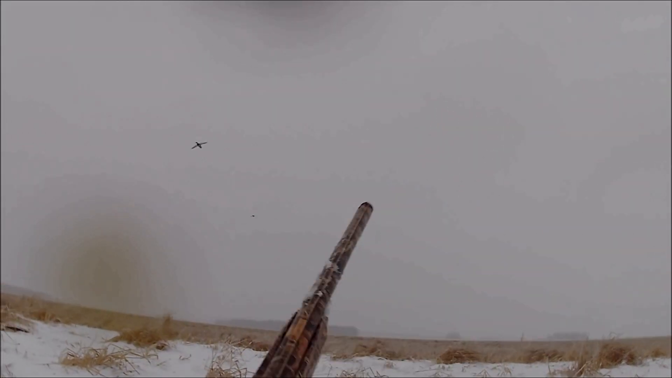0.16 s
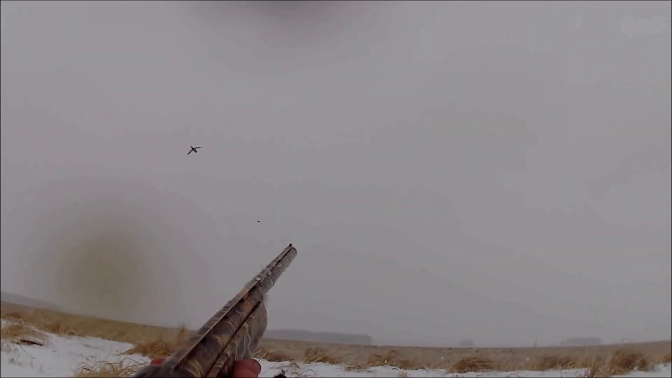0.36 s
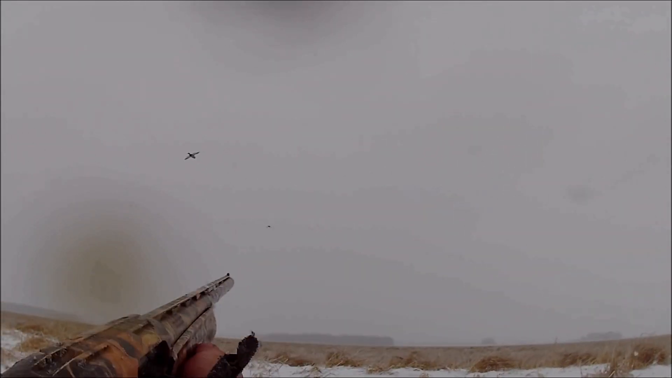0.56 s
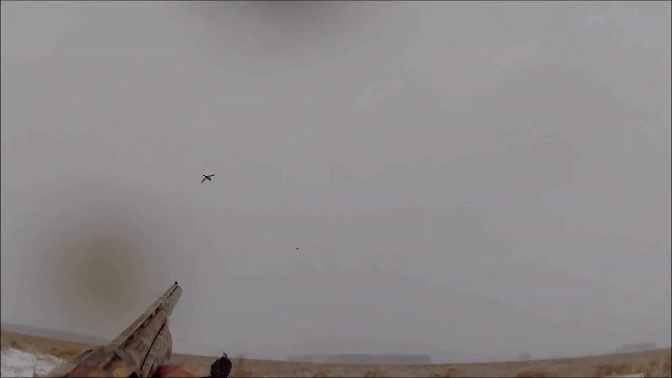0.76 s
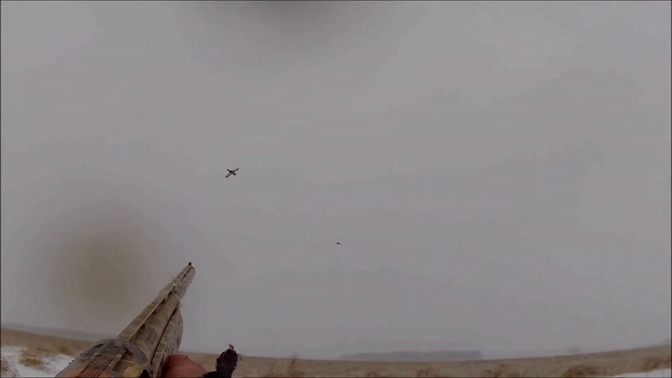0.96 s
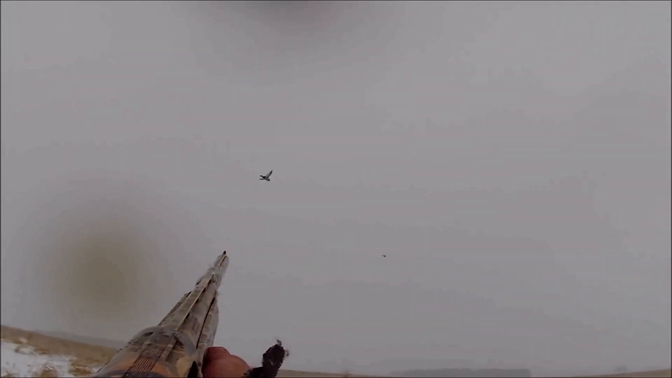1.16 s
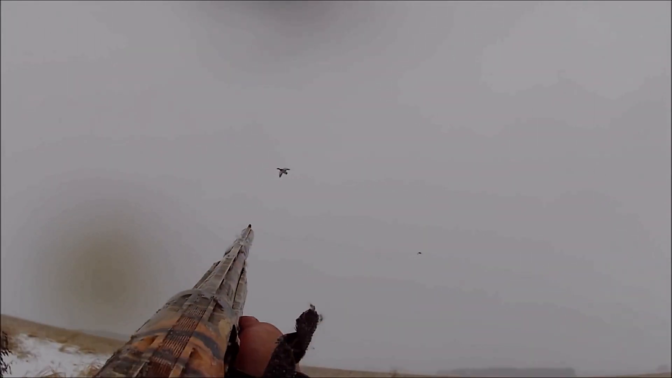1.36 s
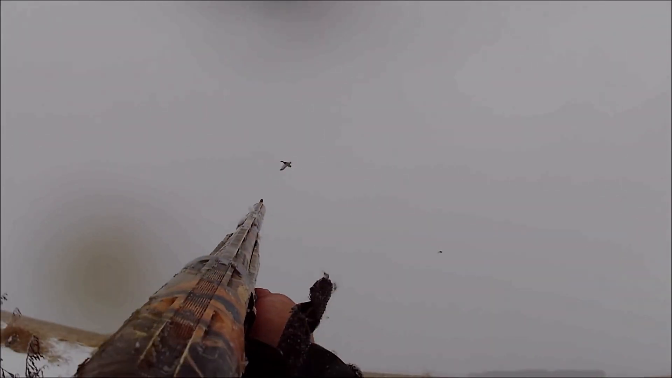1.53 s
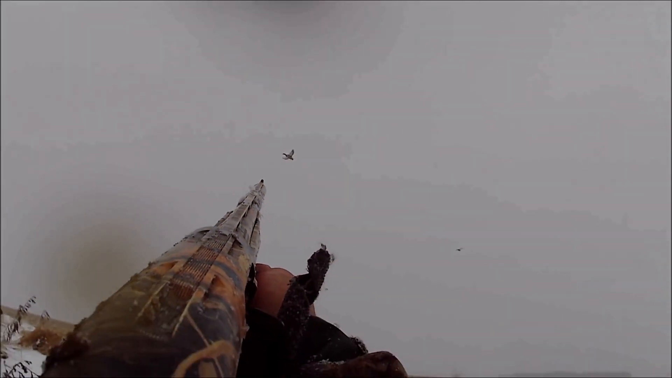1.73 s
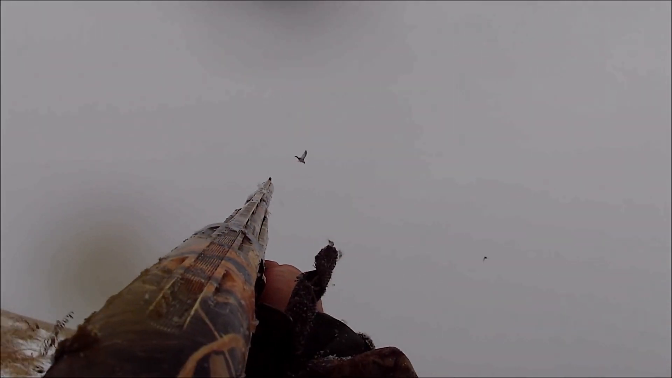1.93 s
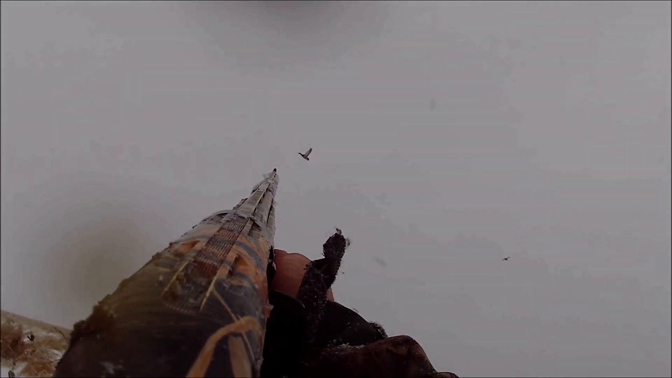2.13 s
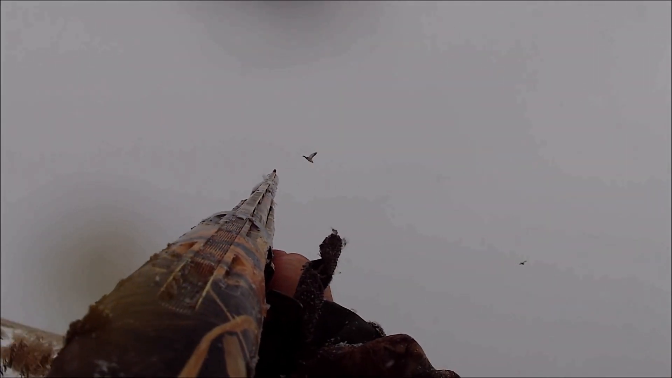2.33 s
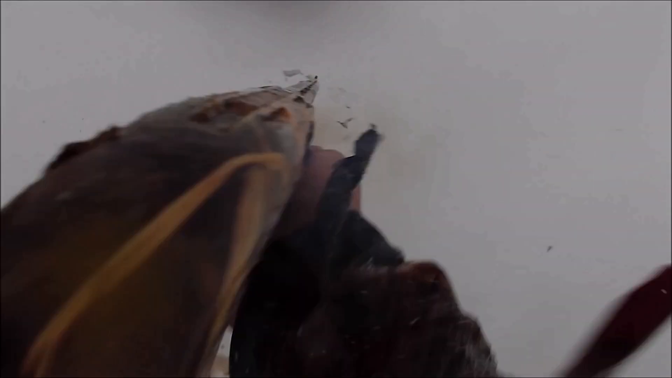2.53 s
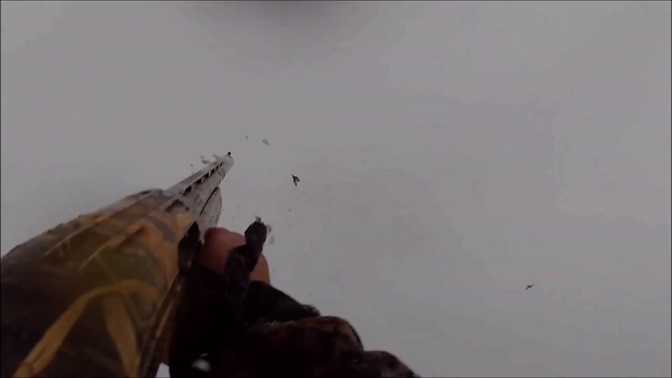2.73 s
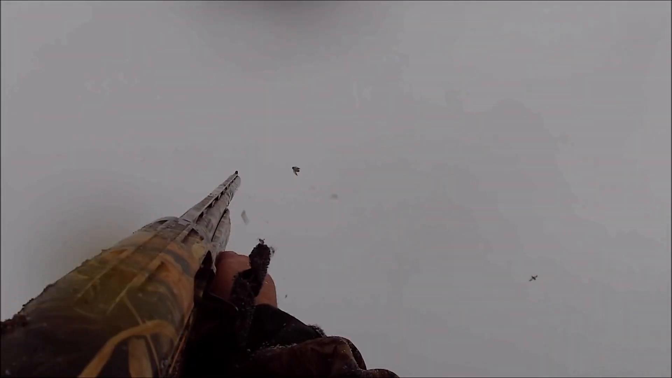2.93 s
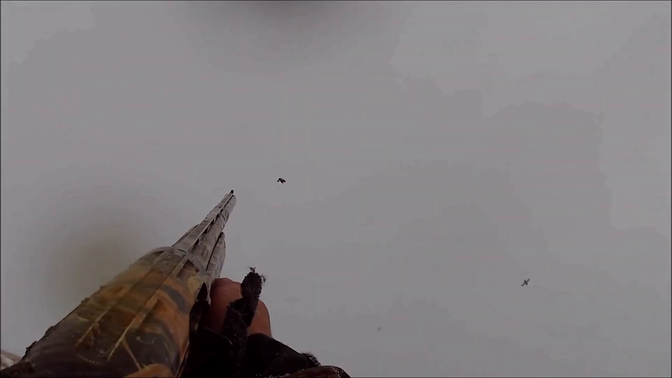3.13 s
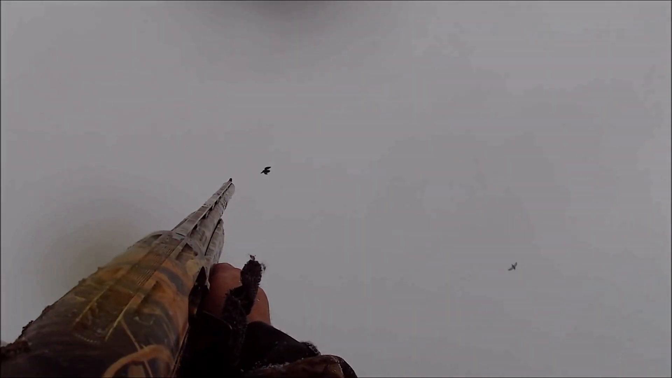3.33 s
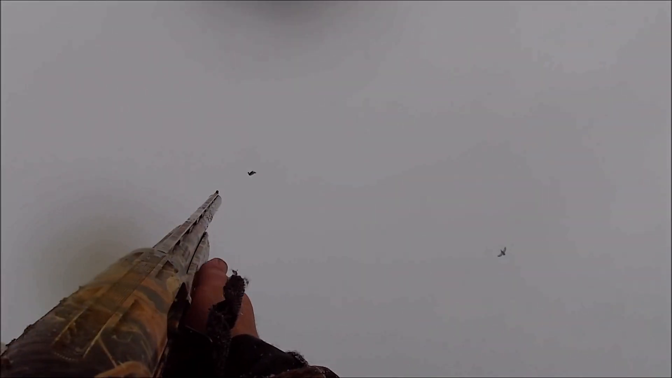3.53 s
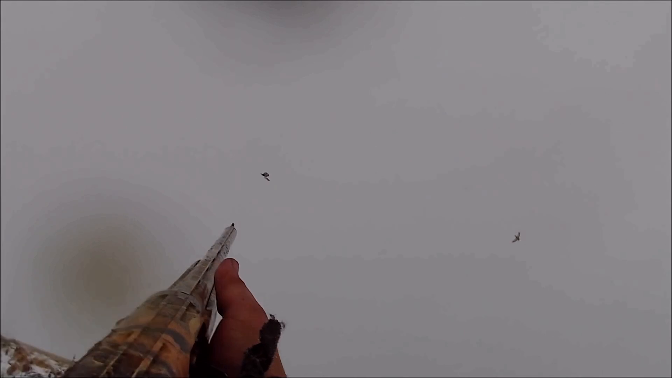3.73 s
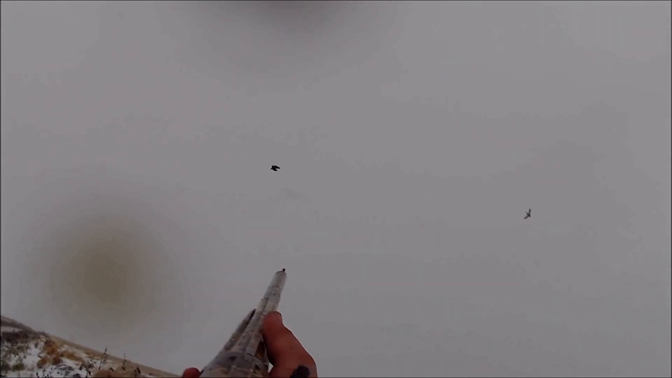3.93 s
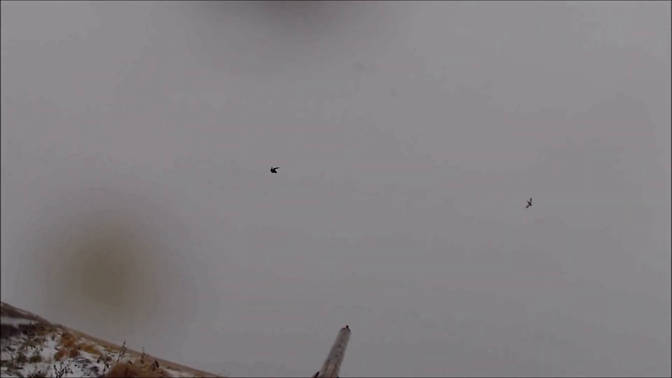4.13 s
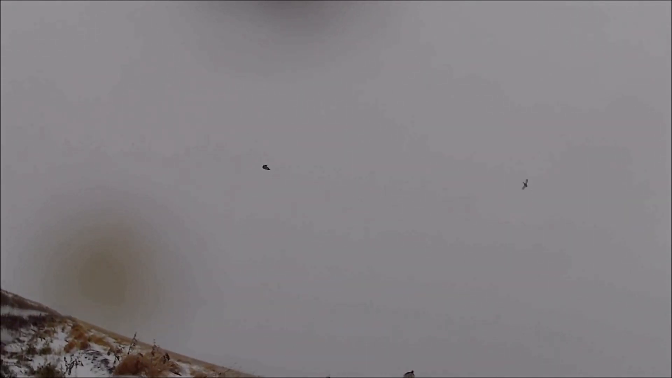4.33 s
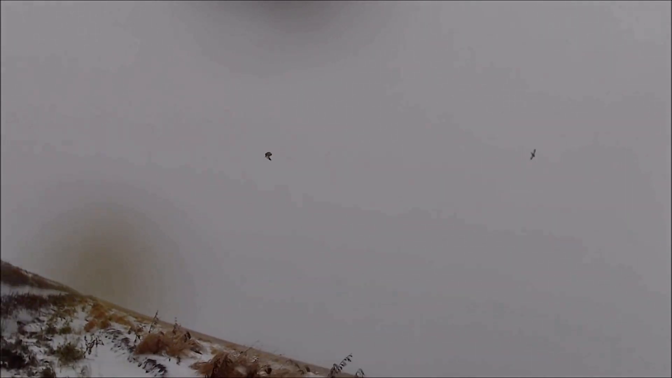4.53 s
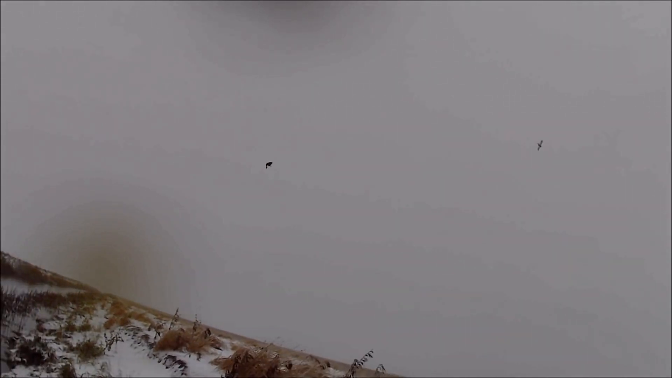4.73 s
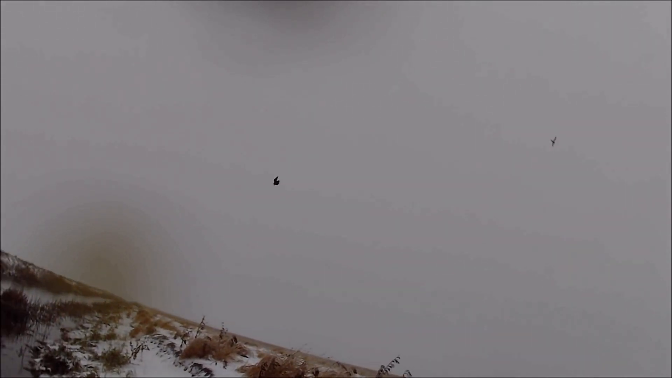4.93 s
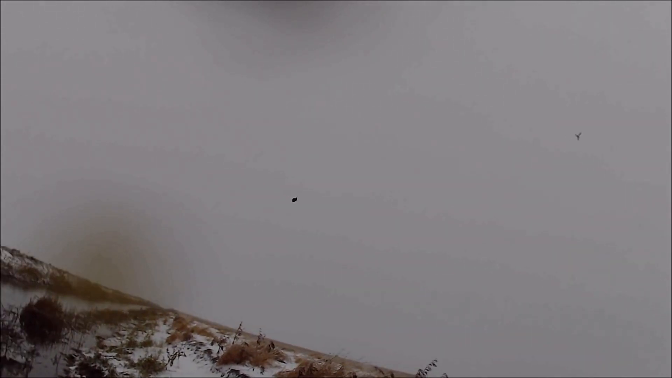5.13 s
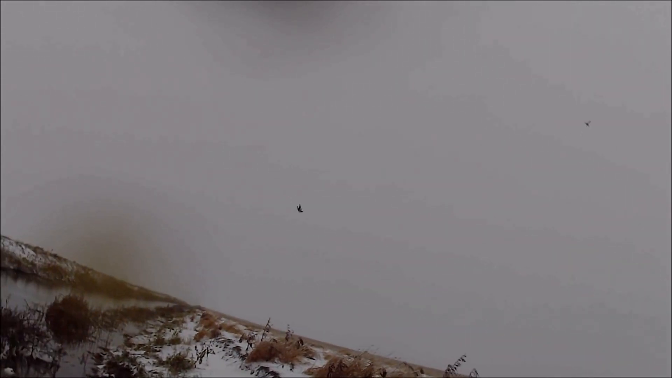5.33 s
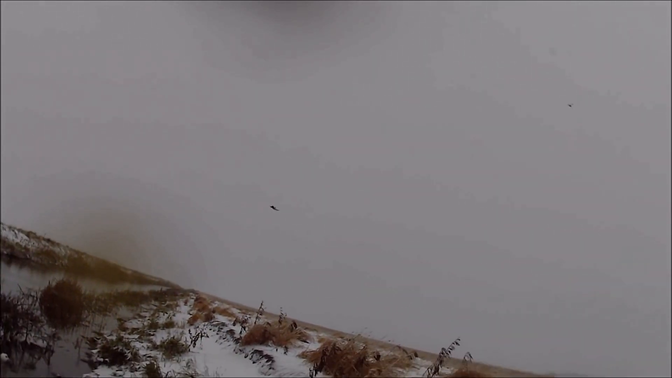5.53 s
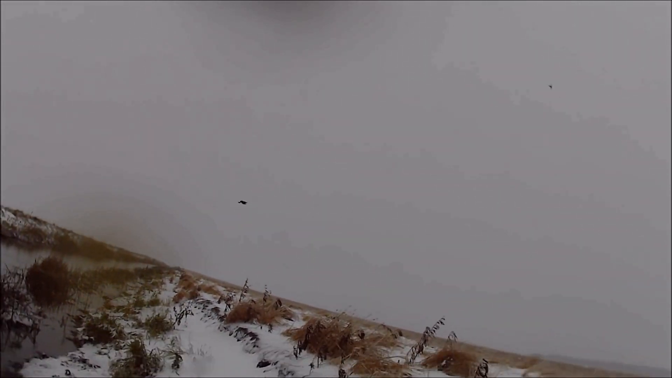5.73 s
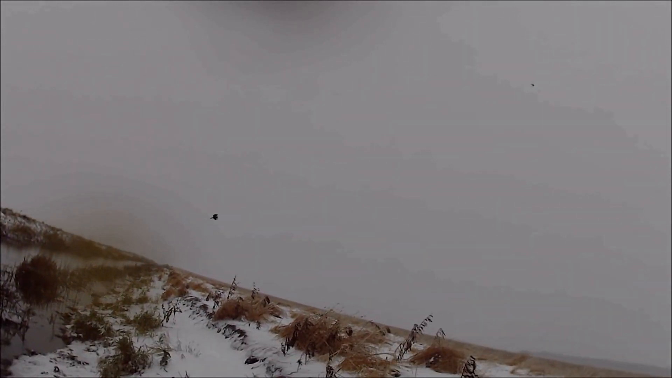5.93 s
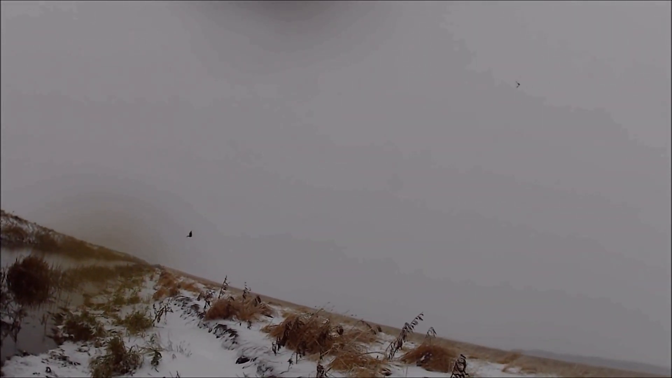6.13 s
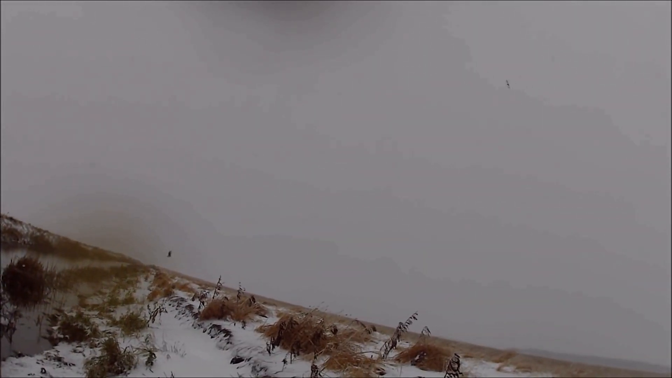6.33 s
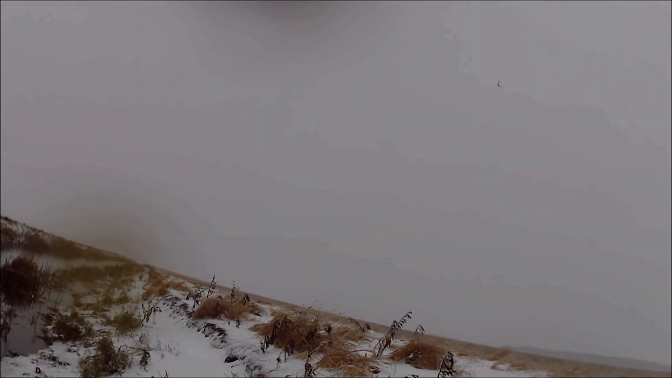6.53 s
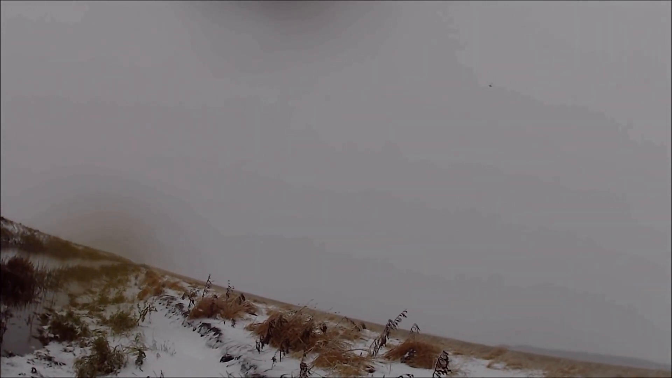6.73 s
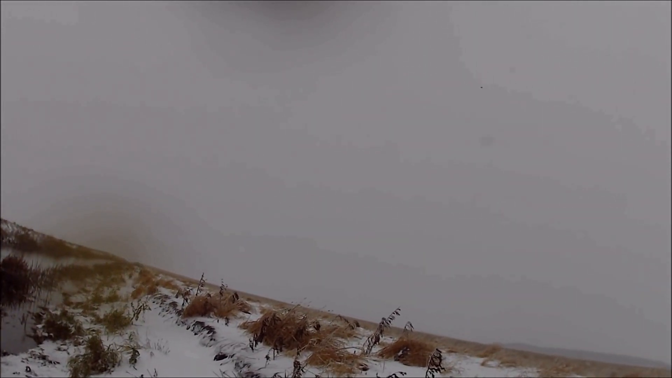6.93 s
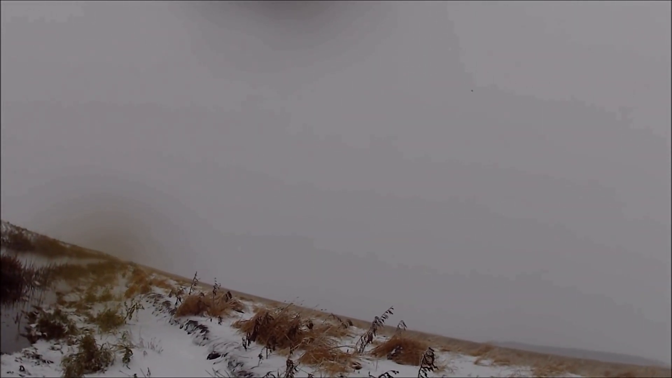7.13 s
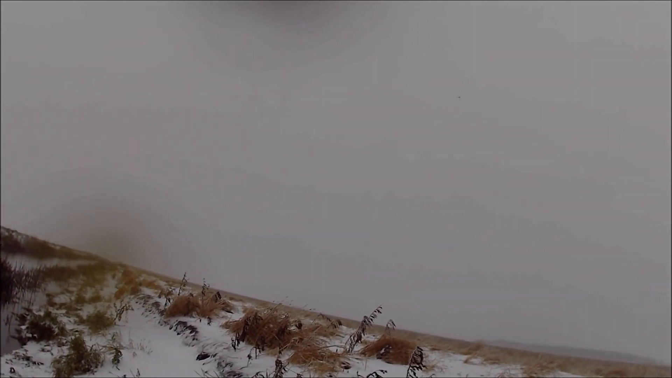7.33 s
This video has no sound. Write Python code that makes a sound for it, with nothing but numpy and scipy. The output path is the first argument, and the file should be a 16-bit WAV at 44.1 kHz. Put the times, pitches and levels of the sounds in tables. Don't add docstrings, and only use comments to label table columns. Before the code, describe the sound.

A small microphone in a closed case, worn on the head outdoors, gives a dull, narrow sound with faint steady hiss and low wind rumble. From 0 to 0.9 s a jacket and sleeve rustle close by, with a sharp gun tick at 0.6 s. Soft wind thumps and a cluster of light clicks come from 1.1 to 1.6 s, then it grows nearly still. At 2.55 s a single shotgun blast hits, extremely loud and flattened by overload, about 25 milliseconds long, dropping abruptly. Short crackling echoes fade by 2.9 s, with hard steel clacks at 2.6 and 2.8 s. Another clack comes at 3.36 s. From 3.3 to 5.3 s cloth rustles in uneven swells, with small ticks and muffled buffets, strong at 4.7 and 5.3 s. More thumps cluster around 5.8 s with faint clicks; rustle thins, and heavier wind buffets return from 7.1 s to the end near 7.4 s.

```python
import sys
import numpy as np
from scipy import signal
from scipy.fft import rfft, irfft, next_fast_len
from scipy.io import wavfile

SR = 44100
rng = np.random.default_rng(int(sys.argv[2]) if len(sys.argv) > 2 else 0)


def dump(signal):
    limited = np.clip(np.atleast_2d(signal).T, -1, 1)
    pcm = np.round(limited * 32767).astype(np.int16)
    wavfile.write(sys.argv[1], SR, pcm)


def boost_factor(decibels):
    exponent = np.asarray(decibels, float) / 20
    return 10 ** exponent


N = 329427

# pitch_hz, level_db (per Hz)
HISS_SPECTRUM = [(180, -23.5), (300, -4), (891, -7), (1510, -9.5), (2300, -20), (3290, -15), (6000, -19),
                 (6400, -20), (8320, -47), (14100, -120)]
# time_s, level_db
WIND_GUSTS = [(0.0, -52), (0.83, -56), (1.04, -50), (1.74, -57.5), (2.29, -56.5), (2.58, -51), (2.8, -53),
              (2.99, -52), (3.3, -45.5), (3.49, -54.5), (4.17, -51.5), (4.49, -54.5), (5.09, -55.5),
              (5.46, -49.5), (5.77, -44.5), (6.56, -55.5), (7.1, -44), (7.46, -49.5)]
# pitch_hz, level_db (per Hz)
WIND_SPECTRUM = [(8, -11), (20, 4.5), (60, -3), (120, -11.5), (250, -20), (450, -35), (900, -56)]
# centre_s, peak_db, pitch_hz
THUMPS = [(1.132, -31.5, 129), (1.183, -39.5, 180), (2.977, -39.5, 168), (3.045, -37.5, 170),
          (3.104, -34, 160), (3.217, -27.5, 150), (3.39, -28.5, 130), (3.646, -35.5, 130),
          (3.704, -33, 204), (3.948, -34, 148.6), (4.088, -36.5, 130), (4.709, -23, 241),
          (4.757, -31.5, 129.5), (5.213, -27.5, 150), (5.271, -30.5, 160), (5.32, -20.5, 149),
          (5.357, -27.5, 129), (5.382, -28, 184), (5.721, -28.5, 208), (5.765, -23, 180), (5.839, -23, 168),
          (5.859, -23.5, 224), (6.102, -33.5, 108), (6.353, -31.5, 209.3), (6.766, -31, 128),
          (7.072, -26.5, 220), (7.172, -29, 225), (7.203, -20.5, 199), (7.258, -30, 189.5),
          (7.314, -22, 410)]
# start_s, spacing_s, peak_db, pitch_hz, count
FLURRIES = [(0.916, 0.013, -38.5, 298, 4), (3.312, 0.018, -35, 170, 9), (3.86, 0.032, -42.5, 100, 3),
            (4.298, 0.02, -35, 147, 4), (5.54, 0.043, -32.5, 94, 5), (5.736, 0.025, -32, 150, 4),
            (5.848, .014, -33.5, 130, 5), (5.909, 0.019, -46, 151, 3), (6.311, 0.025, -36, 100, 3),
            (6.72, 0.023, -37.5, 90, 3), (6.9, 0.039, -42, 70, 5), (7.241, 0.015, -33, 211, 8),
            (7.411, 0.025, -38.5, 160, 3)]
# peak_s, swell_s, fade_s, level_db, brightness_db
CLOTH_MOVES = [(.4, 0.3, 0.13, -41, 5), (0.512, 0.07, 0.081, -35, 1.5), (.66, 0.11, 0.12, -43, 2.5),
               (0.888, 0.1, 0.069, -39, 4), (1.23, 0.3, 0.2, -52.5, 4.5), (1.552, 0.079, 0.29, -62, 8),
               (1.84, 0.088, .08, -64.5, 14), (2.502, 0.044, 0.055, -60.5, 11), (2.92, 0.072, 0.31, -48, 5),
               (3.33, 0.26, 0.24, -45, 0), (3.54, 0.053, 0.11, -47, -3.5), (3.73, 0.12, 0.12, -52, 2.5),
               (3.96, 0.14, 0.14, -45, 6), (4.119, 0.19, 0.055, -41, 7), (4.26, 0.15, 0.052, -48, 2.5),
               (4.4, 0.15, 0.22, -45, 7), (4.57, 0.17, 0.078, -41.5, 2.5), (4.83, 0.17, 0.17, -46, 4.5),
               (5.03, 0.2, 0.41, -44, 6.5), (5.278, 0.36, 0.23, -51.5, 4.5), (5.6, .14, .12, -57.5, 6.5),
               (5.98, 0.085, .18, -55, 1.5), (6.4, 0.56, 0.66, -53, -1.5), (6.95, 0.057, 0.091, -49, 2.5)]
# pitch_hz, level_db (per Hz)
CLOTH_SPECTRUM = [(150, -18), (250, -7), (294, -7.5), (440, -4.5), (667, -0.5), (1140, -3.5), (1550, -1.5),
                  (1880, -4), (2120, -2), (2590, -4.5), (3930, -15.5), (6200, -17.5), (8060, -41),
                  (13600, -120)]
# start_s,
# peak_db, pitch_hz
TICKS = [(0.215, -41.5, 2260), (0.4825, -30, 2240), (0.6088, -18, 1450), (1.174, -38, 1740),
         (1.2059, -24.5, 740), (1.214, -24.5, 2280), (1.2433, -26, 760), (1.2647, -38, 1680),
         (1.3053, -38, 1840), (1.4268, -29, 890), (1.457, -29.5, 1020), (1.501, -40.5, 2280),
         (1.538, -29, 1470), (1.5696, -29.5, 1540), (3.523, -34.5, 1946), (3.7, -36, 2980),
         (3.7196, -29, 1760), (5.5747, -31.5, 2780), (5.623, -39.5, 2720), (5.766, -39, 1040),
         (5.8453, -35, 790), (5.8601, -33.5, 793), (5.9757, -41, 1790), (6.255, -38, 1500),
         (6.517, -38, 1570), (7.0704, -41, 780), (7.165, -38, 1290), (7.2004, -43, 825), (7.239, -38, 990),
         (7.3132, -35, 1030)]
# start_s, peak_db, pitch_hz
CLACKS = [(2.605, -7.5, 1960), (2.7765, -15, 2250), (2.7859, -13, 2370), (2.7952, -6.5, 2250),
          (2.7998, -17.5, 2600), (3.357, -16.5, 2944), (3.432, -31.5, 2500), (3.7651, -31.5, 2620),
          (5.9475, -34.5, 2070), (5.9498, -35.5, 1283), (5.9515, -27, 590)]
# time_s, level_db
BLAST_LEVEL = [
    (2.531, -60),
    (2.537, -27),
    (2.5492, -23),
    (2.5498, 11),
    (2.558, 9),
    (2.5715, 2),
    (2.5735, -19),
    (2.582, -28),
]
# pitch_hz, level_db (per Hz)
BLAST_SPECTRUM = [(40, -7.5), (150, -6.5), (400, -5), (1000, -2.5), (2000, -1), (3000, -8), (5000, -9.5),
                  (7000, -20)]
# peak_s, peak_db
ECHOES = [
    (2.603, -20),
    (2.625, -29),
    (2.679, -28),
    (2.738, -30.5),
    (2.77, -30.5),
    (2.798, -26.5),
    (2.86, -38.5),
]


def in_time(rows):
    s, *columns = np.transpose(rows)
    return [np.interp(np.arange(N) / SR, s, c) for c in columns]


def rms_one(x):
    return x / np.sqrt(np.mean(x ** 2) + 1e-20)


def coloured(x, spectrum):
    hz, db = np.transpose(spectrum)
    size = next_fast_len(N)
    grid = np.maximum(np.arange(size // 2 + 1) * SR / size, 1)
    gain = boost_factor(np.interp(np.log(grid), np.log(hz), db))
    return rms_one(irfft(rfft(x, size) * gain, size)[:N])


def drift(rate_hz):
    r = np.exp(-2 * np.pi * rate_hz / SR)
    wander = signal.lfilter([1], [1, -2 * r, r * r], rng.standard_normal(N + SR))
    return rms_one(wander[SR:])


def grains(per_s, spread_db):
    sizes = boost_factor(spread_db * np.minimum(rng.exponential(1, N), 5)) * rng.choice([-1, 1], N)
    return sizes * (rng.random(N) < per_s / SR)


def steep(x, hz, kind):
    grid = np.arange(N // 2 + 1) * SR / N
    below = np.clip((hz - grid) / 60 + .5, 0, 1)
    return irfft(rfft(x) * (below if kind == "low" else 1 - below), N)


def patchy(x, patch_db, rate_hz):
    edges = 200 * 2 ** np.arange(0, 6.1, 1 / 3)
    total = np.zeros(N)
    for pair in zip(edges, edges[1:]):
        band = signal.butter(1, pair, "band", fs=SR, output="sos")
        total += boost_factor(patch_db * drift(rate_hz)) * signal.sosfilt(band, x)
    return rms_one(total)


def hiss():
    return boost_factor(-61.5) * coloured(rng.standard_normal(N), HISS_SPECTRUM)


def wind():
    level_db, = in_time(WIND_GUSTS)
    lumps = boost_factor(3.0 * drift(9))
    return boost_factor(level_db + 5.5) * lumps * coloured(grains(340, 0.59), WIND_SPECTRUM)


def flurries():
    even = np.array([(start + k * gap, db, hz, gap)
                     for start, gap, db, hz, count in FLURRIES for k in range(round(count))])
    s, db, hz, gap = even.T
    late, louder, higher = np.clip(rng.standard_normal((len(even), 3)), -2, 2).T
    return list(zip(s + .2 * gap * late, db - 1.5 * louder, hz * np.exp(.27 * higher)))


def thumps():
    half = 1300
    out, t = np.zeros(N), np.arange(-half, half) / SR
    buffets = list(THUMPS) + flurries()
    for (s, db, hz), phase in zip(buffets, rng.uniform(0, 2 * np.pi, len(buffets))):
        push = np.cos(2 * np.pi * .9 * hz * t + phase) / (1 + (2.6 * hz * t) ** 2) ** 1.3
        flick = np.cos(2 * np.pi * 2.3 * hz * t + 2 * phase) / (1 + (5.0 * hz * (t - .001)) ** 2)
        thump = boost_factor(db + 3.0) * (push + 0.34 * flick)
        at = round(s * SR) - half
        out[at:at + len(t)] += thump[:N - at]
    return out


def rustle():
    still_db, still_bright_db = -69, 7
    t = np.arange(0, N, 64) / SR
    power = []
    for s, swell, fade, db, _ in CLOTH_MOVES:
        away = np.maximum((s - t) / swell, (t - s) / fade)
        power.append(boost_factor(2 * db - 20 * away ** 1.35 if np.all(away >= 0) else 2 * db - 20 * np.abs(away) ** 1.35))
    power = np.array(power)
    still = boost_factor(2 * still_db)
    total = power.sum(axis=0) + still
    bright = (np.array(CLOTH_MOVES)[:, -1] @ power + still_bright_db * still) / total
    level, bright_db = in_time(np.transpose([t, np.sqrt(total), bright]))

    slips = grains(7000, 3.0) * boost_factor(1.5 * drift(40))
    cloth = patchy(coloured(slips, CLOTH_SPECTRUM), patch_db=1.8, rate_hz=8.0)
    high = signal.sosfilt(signal.butter(2, 1400, "high", fs=SR, output="sos"), cloth)
    unmasked = np.interp(np.arange(N) / SR, [2.52, 2.53, 2.86, 2.9], [1, 0, 0, 1])
    return unmasked * level * (cloth + (boost_factor(np.clip(bright_db, -14, 8)) - 1) * high)


def ticks_and_clacks():
    out, t = np.zeros(N), np.arange(int(.06 * SR)) / SR
    # 60 dB decay in seconds, share of ringing
    touches = [(*row, .017, .35) for row in TICKS] + [(*row, .028, .65) for row in CLACKS]
    snap = 6.0 * (np.arange(len(t)) == 12)
    for s, db, hz, t60_s, ring in touches:
        struck = rng.standard_normal(len(t)) + snap
        around = signal.butter(1, [.27 * hz, 1.7 * hz], "band", fs=SR, output="sos")
        crack = 1.2 * signal.sosfilt(around, struck)
        fall = boost_factor(-60 * t / t60_s)
        onset = 1 - np.exp(-t / .0003)
        tick = fall * (ring * np.sin(2 * np.pi * hz * t) + crack) * onset
        at = round(s * SR)
        out[at:at + len(t)] += boost_factor(db) * tick[:N - at]
    port = signal.lfilter(*signal.iirpeak(2400, 1.6, fs=SR), out)
    return 0.86 * out + 0.68 * port


def offset_swing():
    blast_s = 2.5497
    t = np.maximum(np.arange(N) / SR - blast_s, 0)
    swing = 1.6 * np.exp(-6.7 * t) * np.cos(7.98 * t + 1.13) + .17 * np.exp(-2.4 * t)
    surge = 2.2 * np.exp(-(t / .0195) ** 6)
    onset = 1 - np.exp(-(t / .012) ** 2)
    return (swing + surge) * onset * (1 - .25 * np.exp(-t / .03))


def blast():
    rise_db_per_s, fall_db_per_s = 703, 298
    t = np.arange(N) / SR
    shock_db, = in_time(list(BLAST_LEVEL) + [(2.7, -70)])
    power = boost_factor(2 * shock_db)
    for s, db in ECHOES:
        slope_db = np.minimum(rise_db_per_s * (t - s), fall_db_per_s * (s - t))
        power += boost_factor(2 * (db + slope_db))
    level = np.sqrt(power) * (t > BLAST_LEVEL[0][0])
    flutter = boost_factor(1.8 * drift(150))
    return level * flutter * coloured(grains(12000, 2.0), BLAST_SPECTRUM)


def scene():
    background = hiss() + wind() + thumps()
    handling = rustle() + ticks_and_clacks()
    return (background + handling + offset_swing() + blast())[None]


def top_cut(x):
    return signal.sosfilt(signal.butter(12, 15760, fs=SR, output="sos"), x)


def record(dry):
    narrow_hz, wide_hz, top_hz, wide_from_s = 6450, 12900, 15700, 7.165
    t = np.arange(N) / SR
    clipped = .95 * np.tanh(dry / .95)
    narrow = steep(clipped, narrow_hz, "low")
    treble = clipped - narrow
    overload = np.interp(t, [2.547, 2.55, 2.573, 2.576, 2.586], [0, 1, .7, .25, 0])
    splatter = boost_factor(-19.0) * overload * steep(treble, top_hz, "low")
    air = treble + boost_factor(-64.5) * steep(rng.standard_normal(N), narrow_hz, "high")
    wide = (t > wide_from_s) * steep(air, wide_hz, "low")
    dither = boost_factor(-93.5) * rng.standard_normal(N)
    return top_cut(np.clip(narrow + splatter + wide, -1, 1) + dither)


dry = scene()
out = record(dry)
dump(out)
```